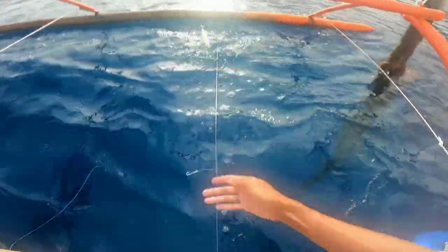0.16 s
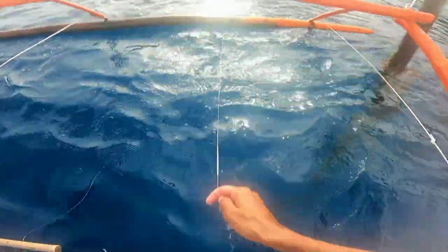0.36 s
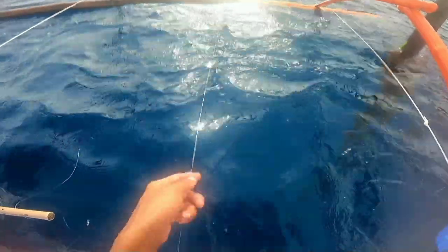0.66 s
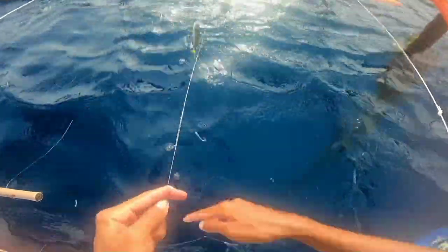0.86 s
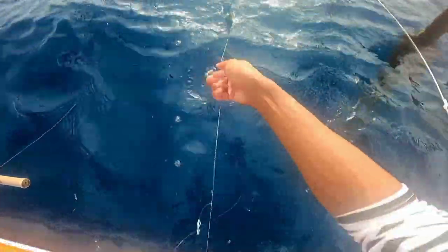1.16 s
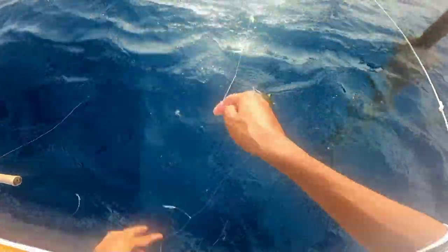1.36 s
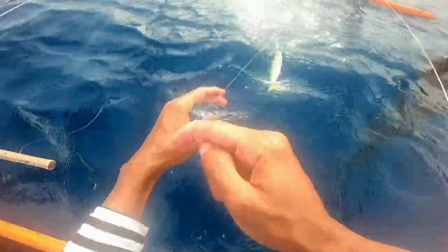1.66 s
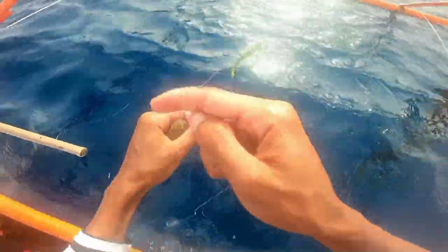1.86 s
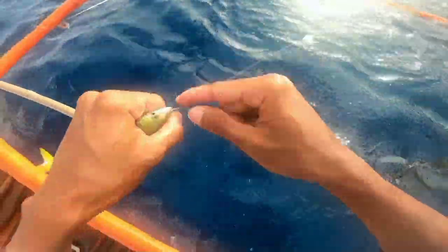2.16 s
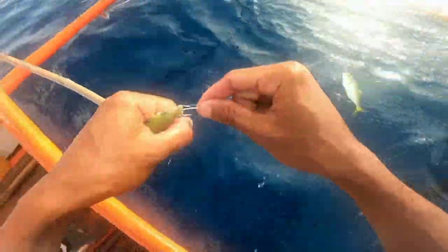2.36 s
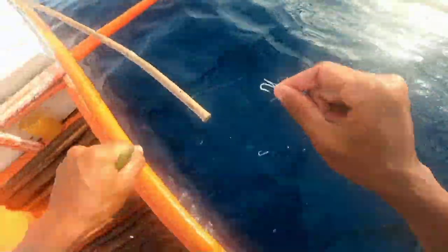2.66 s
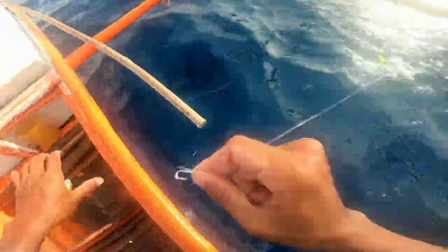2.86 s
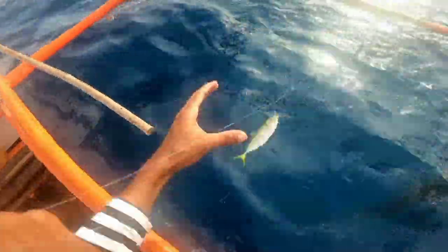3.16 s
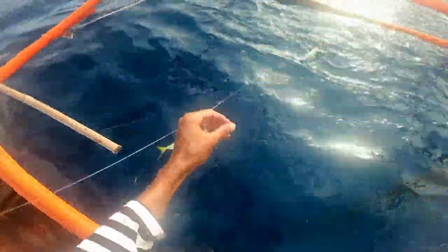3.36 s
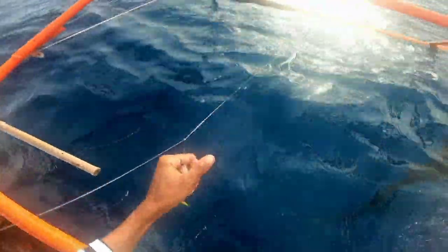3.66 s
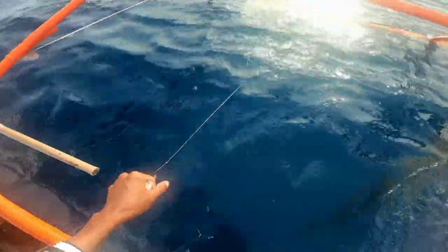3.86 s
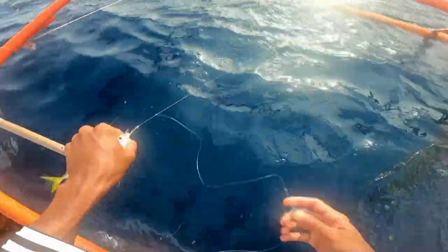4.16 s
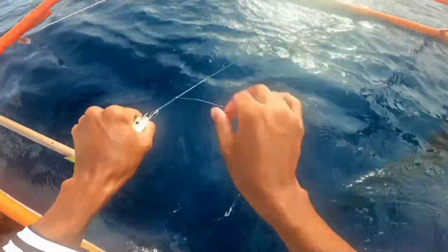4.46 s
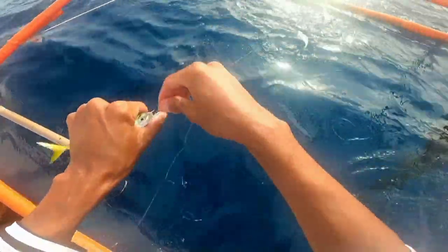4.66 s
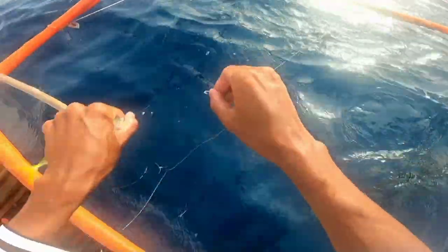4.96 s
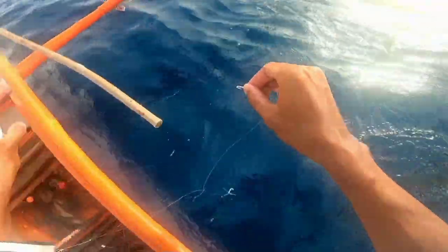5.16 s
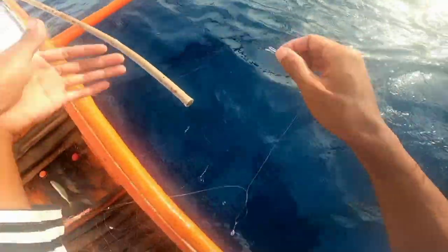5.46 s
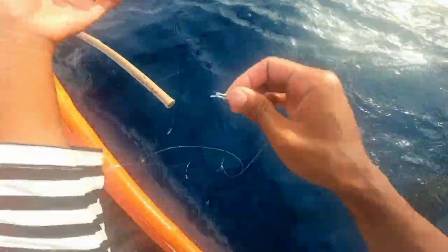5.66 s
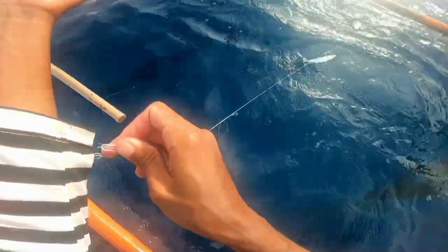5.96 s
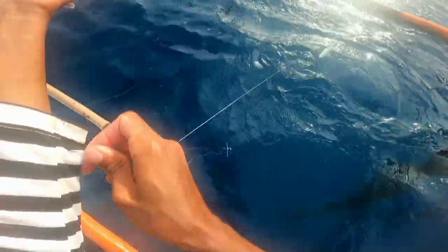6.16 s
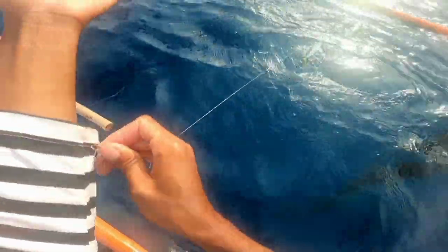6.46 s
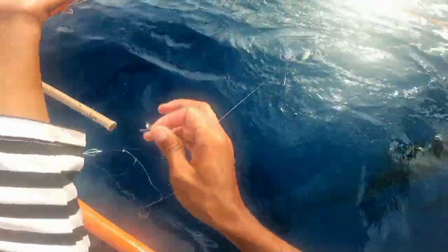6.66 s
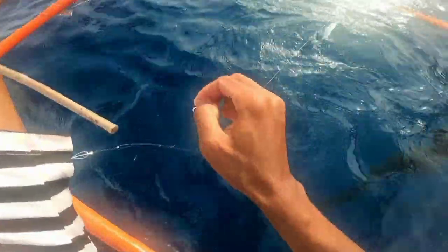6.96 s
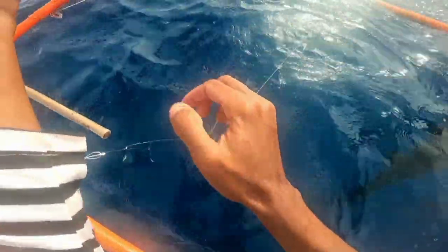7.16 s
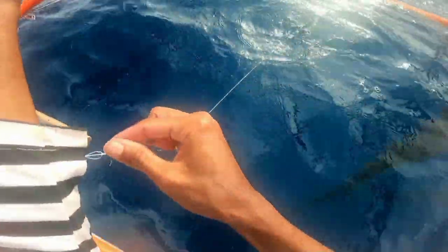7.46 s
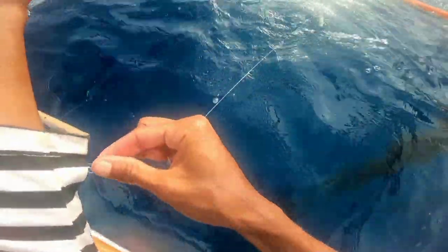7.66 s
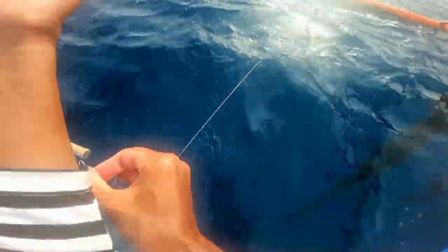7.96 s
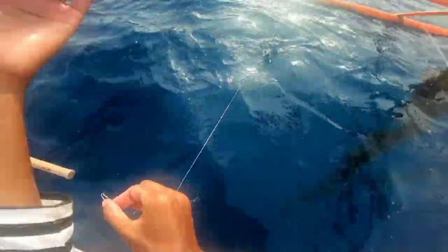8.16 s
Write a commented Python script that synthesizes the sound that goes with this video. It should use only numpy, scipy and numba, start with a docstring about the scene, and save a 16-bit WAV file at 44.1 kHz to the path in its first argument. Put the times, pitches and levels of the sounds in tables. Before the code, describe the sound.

Small boat at sea: low buffeting wind, close irregular water slaps, plinking bubbles, faint fizz and a few dull plank knocks.

```python
"""Wind buffets the two ports of a plastic housing on a small outrigger boat at sea: a deep rumble of coloured noise.
Water slaps the hull as noise bursts and droplet tones; single bubbles ring as damped sines with rising pitch.
Small things knock on the planks, as pushes through wooden resonances. Underneath, swarms of small bubbles
and noise make the lapping, fizz and faint spray hiss. Slaps and lapping ring the cavities of the housing."""
import sys
import numpy as np
from scipy import signal
from scipy.fft import rfft, irfft
from scipy.io import wavfile
from scipy.ndimage import uniform_filter1d
from numba import njit

SR = 44100
rng = np.random.default_rng(int(sys.argv[2]) if len(sys.argv) > 2 else 0)


def waveform_to_disk(signal):
    """Save audio, clipped to [-1, 1], as 16-bit WAV at the path in sys.argv[1]."""
    frames = np.transpose(np.atleast_2d(signal))
    scaled = np.clip(frames, -1, 1) * 32767
    samples = np.round(scaled).astype(np.int16)
    wavfile.write(sys.argv[1], SR, samples)


N = 366912
T = np.arange(N) / SR  # time in seconds
F = np.fft.rfftfreq(N, 1 / SR) + 1e-3  # frequency in Hz, kept above zero for the logarithm
SIDES = np.array([[1], [-1]])  # left and right with opposite sign

# How strong the wind is over time.
# Each row: time in seconds, level of the deep rumble in dB, level of the small eddies in dB.
WIND_STRENGTH = [(0, -24, -27), (.5, -22.5, -26), (.79, -20.5, -22.5), (0.871, -13.5, -29),
                 (.94, -24, -23.5), (1.02, -12.5, -29), (1.12, -19.5, -24.5), (1.6, -20, -27.5),
                 (2.099, -19.5, -26.5), (2.65, -21, -19.5), (2.76, -16, -22), (2.9, -26, -25),
                 (3.08, -15.5, -26), (3.43, -24.5, -26.5), (3.8, -24, -26.5), (4.2, -18.5, -30.5),
                 (4.5, -22.5, -26), (5.4, -20.5, -26.5), (6.2, -22.5, -29), (7.2, -21.5, -26),
                 (7.5, -27.5, -29.5), (8.32, -23.5, -24)]
# Colour of the deep eddies. Each row: frequency in Hz, relative level in dB.
DEEP_COLOUR = [(12, 3), (19, 5), (23, 12), (29, 18), (37, 21), (48, 16), (58, -26)]
# Colour of the small eddies. Each row: frequency in Hz, relative level in dB.
SMALL_COLOUR = [(42, -11.5), (55, 3), (72, 5.5), (81, 1.5), (92, -7.5), (110, -13), (150, -44.5)]
# Colour of the finest eddies. Each row: frequency in Hz, relative level in dB.
RUSTLE_COLOUR = [(90, -9.5), (130, 2.5), (200, -9.5), (350, -21), (700, -26), (1400, -41)]


def wind():
    """Large eddies shake both ports alike and rather evenly; the finest ones differ a little between the ports."""
    s, deep, small = np.transpose(WIND_STRENGTH)
    # deep and small eddies trade strength several times a second
    trade_db = 2 * walk(rate=9)
    deep_db = np.interp(T, s, deep) + trade_db
    small_db = np.interp(T, s, small) - trade_db + 2 * walk(rate=3.97)
    rumble = 0
    for colour, db in ((DEEP_COLOUR, deep_db), (SMALL_COLOUR, small_db)):
        x = eddies(colour)
        even = (uniform_filter1d(x ** 2, size=5000) + .05) ** -.18  # loud moments are held back
        rumble = rumble + unit(x * even) * undb(db)
    apart = eddies([(110, -26), (220, -4), (350, -8), (700, -16), (1400, -32)])
    rustle = (eddies(RUSTLE_COLOUR) + 0.18 * SIDES * apart) * undb(-51.5 + 2.84 * walk(rate=6))
    deep_apart = undb(-50.) * SIDES * eddies([(15, -12), (40, 0), (70, -7), (100, -26)])
    return rumble + rustle + deep_apart


def eddies(colour):
    """Turbulent air as noise of a given colour, with an average level of 1."""
    last_hz, last_db = colour[-1]
    curve_db = on_log([(1, -63.0)] + colour + [(2 * last_hz, last_db - 30)])
    return unit(irfft(rfft(rng.standard_normal(N)) * undb(curve_db), N))


# The loudest slaps and ticks of water.
# Each row: start in seconds, level in the cup region in dB, clack and spit levels relative to that in dB,
# basic time to die away by 60 dB in seconds (each region scales it), left minus right in dB before the ports.
LOUD_SLAPS = [(0.042, -34, -12.5, -17, 0.063, 4.0), (0.067, -51, 8.5, -11, 0.021, 3.5),
              (0.111, -35, -18, -28, 0.048, 4), (0.212, -48, -2, 0.5, 0.038, 1),
              (0.612, -37.5, -2, -19, 0.048, 1), (0.781, -50, -32, -23, 0.03, 4.0),
              (0.899, -41.5, -17, -20, 0.044, 5), (1.052, -37.5, -7.5, -12, 0.02, 3.5),
              (1.387, -32.5, -25, -34, 0.097, 2), (1.759, -47.5, -12, 2.5, 0.062, 1),
              (2.037, -32, -3.5, -26, 0.07, 3), (2.601, -43.5, -18, -15, 0.033, 3),
              (2.653, -41.5, -10.5, -9, 0.063, 2.5), (2.771, -48.5, -8, -8, 0.078, 1),
              (2.874, -37, -8.5, -11.5, 0.089, 4), (3.091, -36, -23, -9.5, 0.049, 6),
              (3.171, -42, -2.5, -12, 0.064, 3), (3.201, -36.5, -23, -24, 0.016, 5),
              (3.322, -42.5, -18, -19, 0.027, 7), (3.34, -33, -4, -15.5, 0.024, 3),
              (3.517, -43.5, -8.5, -15, 0.071, 5), (3.563, -51, -10, 5.5, 0.028, 3),
              (3.631, -40.5, -7, -25, 0.042, 7), (3.644, -62, 2, 15, 0.042, 2),
              (3.74, -55, 3, 6.5, 0.028, 1), (3.765, -52.5, 4, -3, 0.025, 9),
              (3.973, -41.5, -15.5, -30, 0.049, 3.0), (4.287, -68.5, -4, 20, 0.042, 2),
              (4.308, -55.5, 11, 3, 0.083, 2), (4.357, -43.5, -4.5, -1, 0.031, 5.5),
              (4.429, -40.5, -10, -10.5, 0.045, 1), (4.703, -42.5, -33, -13.5, 0.13, 4),
              (4.789, -46, -3, -11, 0.035, 1.5), (4.929, -50.5, 3, -4, 0.097, 3),
              (4.998, -51, 0, 0, .04, 2), (5.011, -51, 3, 9.5, 0.027, 1),
              (5.257, -60.5, -22, 8.5, 0.042, 3), (5.4, -41, -1, -15, 0.081, -1),
              (5.458, -47.5, 1, -3, 0.047, -2), (5.524, -36.5, -14, -34, 0.025, 4),
              (5.613, -32, -9, 1.5, 0.035, 2), (5.66, -56, 10, 4, 0.039, 3),
              (5.709, -42, -10, -4, 0.051, 1), (5.715, -34.5, -11, -8.5, 0.057, 1.5),
              (5.952, -39.5, -11, -24, 0.04, 8), (6.064, -30.5, -10.5, -25, 0.035, 3.5),
              (6.139, -61, -7, 11, .03, 1), (6.162, -45.5, 9, -1.5, 0.049, 2.5),
              (6.207, -45, -18, -6, 0.026, 4), (6.576, -45, -16, -0.5, 0.027, 1),
              (6.653, -37, -9, -29, 0.11, 6), (6.682, -31, 2.5, -22, 0.041, 4.5),
              (6.701, -37, 1.5, -11, 0.055, 3), (6.801, -60.5, 9, 12, 0.074, 2),
              (7.067, -57, -4, 6, .03, -2), (7.073, -48, 6.5, 7.5, 0.054, 3),
              (7.153, -50, -10, -20, 0.032, 5.5), (7.363, -60, 6.5, 12.5, 0.071, 1),
              (7.429, -40.5, -5, -1.5, 0.037, 2), (7.451, -46.5, 2, -7, 0.054, 2),
              (7.77, -39.5, -13, -5.5, 0.058, 1), (7.85, -56.5, -7, 9, 0.02, 0),
              (7.828, -37.5, -18, -3.5, 0.023, 4), (8.035, -60, 6, 12, 0.04, 3),
              (8.227, -63, -10, 7, 0.049, 3)]
# Cavities of the housing in four regions, from low to high: dull, cup, clack and spit.
# Each row: resonance in Hz, its width in Hz, its relative level in dB.
DULL_CAVITIES = [(372, 300, -3.5), (621, 85, 5), (960, 87, 6)]
CUP_CAVITIES = [(913, 47, -7), (1035, 102, 8.5), (1382, 190, 1), (1668, 248, 0.5)]
CLACK_CAVITIES = [(2033, 280, 8), (2410, 454, 13.5), (2758, 104, 17.5), (2934, 220, 9.5), (3683, 190, 2.5)]
SPIT_CAVITIES = [(4430, 520, -1.5), (5296, 280, 6), (6800, 730, -0.5), (9700, 1400, -7)]
REGIONS = (DULL_CAVITIES, CUP_CAVITIES, CLACK_CAVITIES, SPIT_CAVITIES)


def slaps():
    """Each slap is a tick that rings the cavities, a softer wash of noise, and a droplet tone in each region."""
    s, db, clack, spit, t60, pan = np.vstack([LOUD_SLAPS, patter(count=40)]).T
    start = (s * SR).astype(np.int64)
    rise_s, tick_s = 0.0018, 0.0062
    # level in dB, decay factor, dB taken off for noise peaks, highest droplet in Hz, tick in dB; treble dies first
    settings = ((-13, 1.3, 5., 850, -4.), (0, 1.1, 5., 1600, -1.5),
                (clack, .8, 0., 3200, 4.), (spit, .55, 1., 7000, 4.))
    out = 0
    for modes, (rel_db, last, crest_db, top_hz, tick_db) in zip(REGIONS, settings):
        low_hz = modes[0][0]
        hz = low_hz * (top_hz / low_hz) ** rng.random(len(s))
        droplet = blips(N, start, hz, hz * t60, np.ones(len(s)), 0.36 + 0 * hz, 0., 1. * SR)
        ragged = rng.standard_normal(N) * undb(2. * walk(rate=300))
        blow = bursts(s, db + rel_db - crest_db, t60 * last, pan, rise=rise_s)
        tick = bursts(s + rise_s / 2, db + rel_db + tick_db, tick_s + 0 * s, pan, rise=0.0005)
        out = out + ring((blow + tick) * ragged, modes) + 0.13 * blow * droplet
    return out


def patter(count):
    """Faint slaps at random moments, a few fainter still, each with its own balance of regions."""
    c = rng.random((count, 6)).T
    start = c[0] * (T[-1] - .1)
    db = -54.5 + 2.5 * np.log(c[1] + 0.25)
    clack, spit = 24 * c[2] - 20, 24 * c[3] - 24
    t60, pan = 0.018 + 0.011 * c[4], 6 * c[5]
    return np.array([start, db, clack, spit, t60, pan]).T


# Single bubbles. Each row: start in seconds, level in dB before the swell and decay, starting pitch in Hz,
# life counted in cycles of that pitch.
LONE_BUBBLES = [(.044, -24.5, 1100, 18), (.043, -21, 2170, 25), (.067, -20.5, 2280, 25),
                (.1, -31, 2150, 30), (.281, -40, 1050, 12), (.283, -41, 2660, 30), (0.111, -22.5, 1170, 16),
                (.497, -38, 870, 23), (0.57, -36, 387, 23), (.64, -42, 4100, 30), (0.734, -38, 1016, 22),
                (.965, -37, 986, 35), (.983, -39, 2750, 25), (1.17, -35, 465, 8.9), (1.865, -38, 320, 19),
                (.878, -21.5, 2460, 14), (.899, -14.5, 1046, 9.4), (1.25, -37.5, 2780, 30),
                (1.316, -32, 1404, 31), (1.35, -43, 1450, 18), (1.365, -37, 2175, 35),
                (1.387, -35, 1590, 15), (1.4, -38, 2530, 38), (1.42, -36, 1670, 40), (1.5, -42, 1000, 18),
                (1.565, -44, 2600, 35), (1.607, -45, 5300, 40), (1.652, -44, 4470, 44),
                (1.727, -41, 5300, 40), (1.787, -41, 2850, 30), (1.833, -38, 2080, 20),
                (1.866, -36, 1050, 15), (2.768, -26.5, 1190, 8.6), (2.935, -32, 6250, 50),
                (2.974, -28.5, 5140, 36), (3.025, -34, 960, 25), (3.11, -31, 1505, 29),
                (3.199, -23, 1590, 18.4), (3.262, -32, 5400, 51), (3.318, -30, 1010, 14),
                (3.362, -33, 2100, 27), (3.573, -45, 2300, 30), (3.591, -45, 1550, 21),
                (3.613, -36, 3040, 25), (3.631, -25.5, 2890, 44), (3.643, -31, 3110, 30),
                (4.052, -43, 4500, 30), (4.059, -43, 2620, 35), (4.08, -39, 5200, 54),
                (4.114, -42, 2700, 25), (4.155, -45, 3000, 30), (4.163, -38, 1060, 25),
                (4.197, -44, 5150, 60), (4.222, -47, 5250, 60), (4.248, -43, 2100, 20),
                (4.316, -41, 5070, 50), (4.517, -44, 5200, 35), (4.566, -44, 2530, 30),
                (4.59, -43, 2600, 25), (4.61, -43, 2600, 25), (4.736, -35, 4980, 43), (4.82, -43, 2470, 37),
                (4.866, -41, 2580, 20), (4.865, -46, 5250, 25), (4.943, -41, 5050, 35),
                (4.963, -39, 2180, 25), (4.725, -30, 1080, 14), (4.789, -27, 1700, 18),
                (5.262, -43, 562, 31), (5.463, -40, 327, 8.5), (5.826, -39, 300, 3.6),
                (5.398, -24.5, 1320, 18), (5.988, -38.5, 540, 18), (6.085, -37, 2700, 34),
                (6.237, -43, 6870, 40), (6.35, -37, 2330, 20), (6.4, -40.5, 900, 52), (6.35, -39, 425, 25),
                (6.466, -33, 594, 10), (6.524, -33, 2180, 36), (6.572, -43, 473, 15),
                (6.59, -29, 1000, 8.7), (6.611, -33, 1090, 19), (6.652, -28, 2500, 52),
                (6.653, -28.5, 2920, 43), (6.682, -19, 2480, 20), (6.683, -17, 2830, 16),
                (6.7, -22.5, 1460, 20), (6.708, -35, 4900, 25), (7.084, -33, 1047, 27),
                (7.12, -31.5, 2400, 19), (7.134, -38, 2460, 24), (7.155, -28.5, 1374, 22),
                (7.173, -40, 2550, 25), (7.707, -35, 1890, 19), (8.035, -33.5, 2180, 19)]


def bubbles():
    """Lone pockets of air that ring clearly, each reaching the right port a little earlier or later."""
    s, db, hz, cycles = np.transpose(LONE_BUBBLES)
    lag = np.round(4 * rng.standard_normal(len(s)))  # in samples
    glide = np.where(hz < 700, .55, 0.036)  # large, low bubbles sweep up as they open
    ports = []
    for delay in (0, lag):
        start = (s * SR + delay).astype(np.int64)
        ports.append(blips(N, start, hz, np.maximum(cycles, 2), undb(db), glide, 0.17, 1. * SR))
    return np.array(ports)


@njit
def blips(n, start, hz, cycles, size, glide, rise, sr):
    """Damped sines that swell briefly; the pitch rises as the bubble nears the surface."""
    out = np.zeros(n)
    for k in range(len(start)):
        life = cycles[k] * sr / hz[k]  # in samples
        phase = 0.
        for j in range(min(int(2 * life), n - start[k])):
            phase += 2 * np.pi * hz[k] * (1 + glide[k] * j / life) / sr
            swell = min(j / (sr / hz[k] + rise * life), 1.)
            out[start[k] + j] += size[k] * swell * np.exp(-3 * j / life) * np.sin(phase)
    return out


# Knocks on the planks.
# Each row: start in seconds, level of the push in dB, hardness in dB (how strong the edge is beside the push).
PLANK_KNOCKS = [(0.57, -44, -10), (0.868, -33.5, -28), (1.118, -34.5, -25), (1.17, -33, -16),
                (1.446, -38.5, -23), (1.901, -40.5, -18), (2.58, -28.5, -31), (2.603, -29, 0.5),
                (2.619, -40.5, -4.5), (2.628, -32, -1.5), (2.641, -30.5, -4), (2.646, -30.5, -1),
                (2.652, -39.5, 5.5), (2.661, -37.5, -5), (2.69, -34, -10.5), (2.949, -42, -14),
                (3.338, -39.5, -3.5), (3.596, -38.5, -13), (5.827, -36.5, -35), (6.648, -35, -14),
                (7.163, -39, -19), (7.941, -29, -22.5), (8.225, -42, -21)]
# Resonances of the planks. Each row: frequency in Hz, width in Hz, relative level in dB.
PLANK_MODES = [(160, 210, -8.5), (300, 67, -3.5), (465, 630, -12.5)]
# Upper resonances, rung by a hard edge. Each row: frequency in Hz, width in Hz, relative level in dB.
HARD_PLANK_MODES = [(411, 62, -3.5), (556, 72, -5.5), (685, 83, -3), (945, 90, 2.5), (1140, 110, -5.5)]


def knocks():
    """Blows on the planks: a short rough push, and an edge that rings the upper modes when hard."""
    s, db, hard_db = np.transpose(PLANK_KNOCKS)
    pan = 0 * s - 1.5
    push = bursts(s, db, 0.097 + 0 * s, pan, rise=0.002)
    edge = bursts(s, db + hard_db + 8.5, 0.0095 + 0 * s, pan, rise=0.00017)
    rough = 0.5 + 0.27 * rng.standard_normal(N)
    return ring(push * rough, PLANK_MODES) + ring(edge, HARD_PLANK_MODES)


def hull(x):
    """The open hull throws sound back in a short ragged tail, another one at each port."""
    u = T[:int(.15 * SR)]
    t60_s, echo_db = 0.045, -8
    tail = rng.standard_normal((2, len(u))) * np.exp(-np.log(1000) * u / t60_s) * (u > .002)
    tail = tail / np.sqrt(np.sum(tail ** 2, axis=1, keepdims=True))
    middle = x.mean(axis=0)[None]
    return x + undb(echo_db) * signal.fftconvolve(middle, tail, axes=1)[:, :N]


# Water along the hull over time.
# Each row: time in seconds, lapping level in dB, fizz level in dB, spray hiss level in dB.
WATER_LEVELS = [(0.0, -56.5, -67, -54), (0.3, -63.5, -64.5, -52.5), (0.97, -55.5, -64.5, -57),
                (1.6, -56.5, -56, -53), (1.85, -50, -56.5, -55.5), (2.459, -62, -73, -62),
                (2.92, -57.5, -63, -62), (3.57, -55, -58.5, -59), (4.01, -61.5, -64, -54.5),
                (4.47, -55.5, -64, -54), (4.771, -59.5, -57.5, -57), (5.17, -60, -73, -59),
                (5.65, -59.5, -57, -60), (5.95, -54.5, -69, -60), (6.07, -52.5, -56, -57),
                (6.86, -58.5, -69, -58.5), (7.81, -60.5, -62.5, -58), (8.32, -61, -67.5, -55)]
# Resonances that colour the spray. Each row: frequency in Hz, width in Hz, relative level in dB.
SPRAY_MODES = [(6120, 170, -3), (6307, 390, -1.5), (6860, 1410, -3), (8050, 950, -45)]


def lapping():
    """Gurgle, fizz and spray: swarms of bubbles in a soft wash, coloured by the housing, surging in rushes."""
    s, *columns = np.transpose(WATER_LEVELS)
    lap, fizz, spray = (undb(np.interp(T, s, c)) for c in columns)
    swell = walk(rate=6.5)
    swarms = (grains(count=900, lo_hz=297.6, hi_hz=915, cycles=11.0, spread_db=5.0),
              grains(count=2500, lo_hz=806.6, hi_hz=1918, cycles=16.3, spread_db=3.5),
              grains(count=3500, lo_hz=1690, hi_hz=4067, cycles=20.0, spread_db=4.0),
              grains(count=4000, lo_hz=3524, hi_hz=8030, cycles=25.0, spread_db=2.0))
    gurgle = wash(DULL_CAVITIES, swarms[0], -3.5, 1.7, 0.3, 1.5 * swell)
    cup = wash(CUP_CAVITIES, swarms[1], 5.5, 2.1, 0.45, 1.8 * swell)
    clack = wash(CLACK_CAVITIES, swarms[2], 4.0, 2.36, 0.52, 1.5 * swell)
    spit = wash(SPIT_CAVITIES, swarms[3], 0., 4.0, 0.47, 1.0 * swell)

    high_pass = signal.butter(8, 5300, "high", fs=SR, output="sos")
    fine = signal.sosfilt(high_pass, rng.standard_normal(N))
    drops = grains(count=4000, lo_hz=5870, hi_hz=8700, cycles=61.0, spread_db=0.0)
    hiss = wash(SPRAY_MODES, fine + .5 * drops, -49.0, 1.8, 0.11, 0.27 * swell)

    # in a rush the bubbles merge into a swish, through wider resonances
    rushes = 0
    for level, modes, swarm, apart in zip(rush_levels(), REGIONS, swarms, (0.23, 0.31, 0.2, 0.39)):
        wide = [(hz, 1.36 * width, db) for hz, width, db in modes]
        rushes = rushes + level * wash(wide, 0.7 * swarm, 0., 2.94, apart, 0.)
    return lap * (undb(-15.0) * gurgle + cup) + fizz * (clack + undb(-4.5) * spit) + spray * hiss + rushes


# Longer rushes of water. Each row: start in seconds, length in seconds, level in dB,
# brightness in octaves above 1 kHz, fall away from that brightness in dB per octave.
WATER_RUSHES = [(0.012, 0.16, -50, 0.44, 4.5), (0.15, 0.14, -54.5, 0.84, 10.5),
                (0.581, 0.074, -53, 0.69, 2.5), (0.885, 0.044, -46.5, 0.16, 8), (1.292, 0.13, -52.5, 1, 18),
                (2.018, 0.14, -54, 1.6, 13.5), (2.603, 0.061, -27, -0.24, 14.5),
                (2.784, 0.15, -49, 0.97, 5.5), (2.898, 0.076, -47, -.7, 19), (3.016, 0.13, -44.5, 0.64, 25),
                (3.731, 0.11, -49, 1.04, 4.5), (4.029, 0.16, -55, 1.4, 5.5),
                (4.312, 0.206, -56.5, 1.1, 3.5), (4.517, 0.096, -47, 0.81, 10),
                (5.383, 0.046, -44, 1.64, 10.5), (5.912, 0.19, -52, 0.98, 9.5),
                (6.648, 0.065, -37.5, 0.82, 6.5), (7.745, .13, -49, 0.88, 3)]


def rush_levels():
    """Each rush swells and fades, strongest in the regions near its own brightness."""
    middles_oct = np.log2([.6, 1.2, 2.6, 5.5])  # middle of each region, octaves above 1 kHz
    levels = np.zeros((4, N))
    for t, length, db, bright, fall_db in WATER_RUSHES:
        region_db = db - fall_db * abs(middles_oct - bright)
        fade = np.minimum((T - t) / 0.041, (t + length - T) / 0.039 + .5)
        levels += undb(region_db)[:, None] * np.clip(fade, 0, 1)
    return levels


def grains(count, lo_hz, hi_hz, cycles, spread_db):
    """A random swarm of small bubbles; a wider spread makes most faint and some louder."""
    c = rng.random((count, 4)).T
    start = (c[0] * N).astype(np.int64)
    hz = lo_hz * (hi_hz / lo_hz) ** c[1]
    size = undb(-spread_db * np.log(c[3] + .02))
    return unit(blips(N, start, hz, cycles * (0.72 + c[2]), size, 0.1 + 0 * hz, .2, 1. * SR))


def wash(modes, swarm, noise_db, flicker_db, apart, swell_db):
    """Bubbles and noise ring one region; a part comes from all around and differs at the ports."""
    mix = swarm + undb(noise_db) * rng.standard_normal(N)
    around = unit(ring(np.roll(mix, N // 3), modes))
    both = unit(ring(mix, modes)) + apart * around * SIDES
    return both * undb(flicker_db * walk(rate=30) + swell_db)


def undb(db):
    """Turn dB into a plain loudness factor."""
    return 10 ** (np.asarray(db, float) / 20)


def unit(x):
    """Scale a signal to an average (rms) level of 1."""
    return x / np.sqrt(np.mean(x ** 2))


def on_log(table):
    """Read a (Hz, value) table at every frequency, in even steps of pitch."""
    hz, v = np.transpose(table)
    return np.interp(np.log(F), np.log(np.maximum(hz, 1)), v)


def ring(x, modes):
    """Parallel resonances with steep outer skirts, scaled so that white noise keeps its level."""
    h = 0
    for k, (hz, width, db) in enumerate(modes):
        h = h + (-1) ** k * undb(db) * 1j * F * width / (hz ** 2 - F ** 2 + 1j * F * width)
    lo, hi = 1j * F / (0.42 * modes[0][0]), 1j * F / (1.273 * modes[-1][0])
    skirts = lo ** 2 / (1 + 1.43 * lo + lo ** 2) / (1 + 1.0 * hi + hi ** 2)
    h = h * skirts ** 2
    return irfft(rfft(x) * h / np.sqrt(np.mean(abs(h) ** 2)), N)


def walk(rate):
    """A random wander: levels held for 1 / rate seconds, smoothed twice, scaled to an rms of 1."""
    k = int(SR / rate)
    steps = np.repeat(rng.standard_normal(N // k + 1), k)
    return unit(uniform_filter1d(uniform_filter1d(steps, k), k)[:N])


def bursts(s, db, t60, pan_db, rise):
    """Stereo envelope of sudden blows that die away by 60 dB in t60 seconds."""
    out = np.zeros((2, N))
    for t, d, r, p in zip(s, db, np.maximum(t60, .004), pan_db):
        i = int(t * SR)
        u = T[:min(int(r * SR), N - i)]
        shape = (1 - np.exp(-u / rise)) * np.exp(-np.log(1000) * u / r)
        out[:, i:i + len(u)] += undb(d + p * SIDES / 2) * shape / shape.max()
    return out


# How the two ports differ in colour. Each row: frequency in Hz, left minus right in dB.
PORT_COLOUR = [(180, -.3), (310, -1.5), (540, 0), (930, 1.5), (1600, .5), (2800, -2), (4800, -1.5),
               (8400, -.5)]
# How the two ports differ in timing. Each row: frequency in Hz, lead of the left port in radians.
PORT_TIMING = [(100, 0), (600, .25), (860, -.4), (1210, -.2), (1800, -.9), (2240, -.15), (3100, -1.3),
               (3550, .1), (3960, -1.4), (4350, -.1)]


def scene():
    """Water and knocks arrive through two slightly different ports; the wind acts on the ports directly."""
    near = lapping() + hull(slaps() + knocks() + bubbles())
    # each port takes half of the difference
    half = undb(on_log(PORT_COLOUR) / 2) * np.exp(1j * on_log(PORT_TIMING) / 2)
    return irfft(rfft(near) * np.array([half, 1 / half]), N) + wind()


def record(dry):
    """The membrane over the ports rolls the treble off; faint self noise is added; the top is cut."""
    roll_hz, top_hz = 7330, 15400
    soft = signal.sosfilt(signal.butter(5, roll_hz, fs=SR, output="sos"), dry)
    soft = soft + undb(-99.0) * rng.standard_normal(dry.shape)
    return signal.sosfilt(signal.ellip(8, .2, 70, top_hz, fs=SR, output="sos"), soft)


dry = scene()
out = record(dry)
waveform_to_disk(out)
```